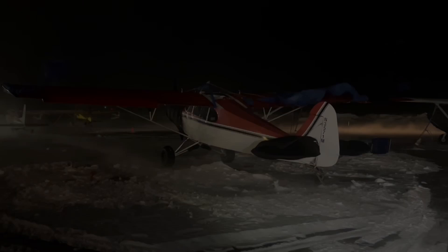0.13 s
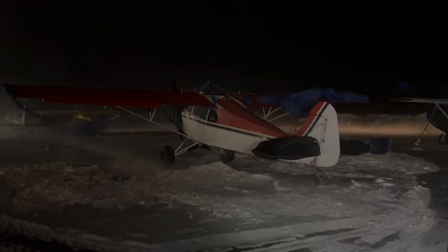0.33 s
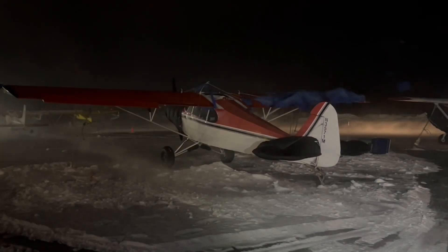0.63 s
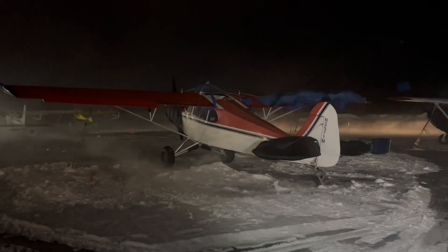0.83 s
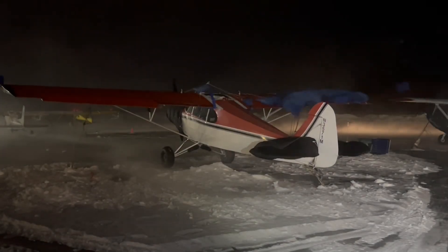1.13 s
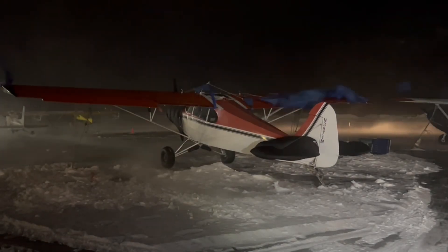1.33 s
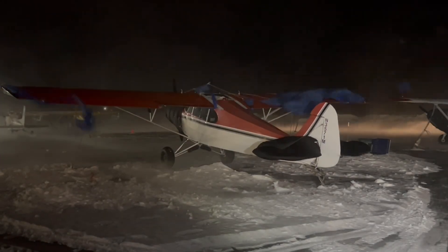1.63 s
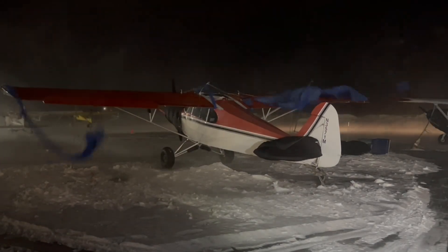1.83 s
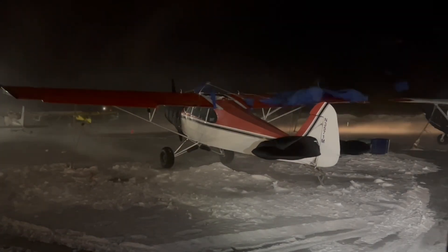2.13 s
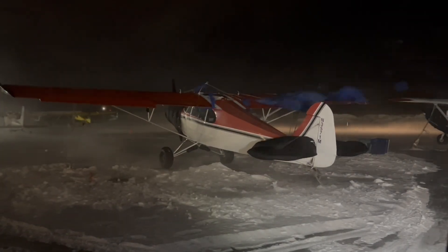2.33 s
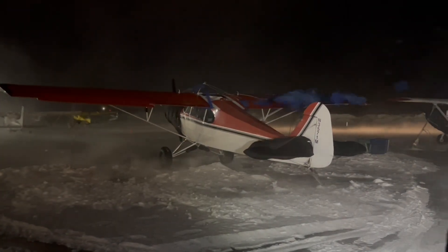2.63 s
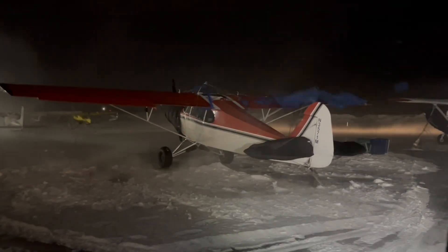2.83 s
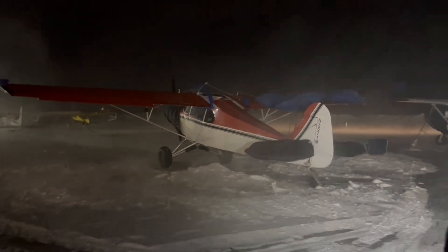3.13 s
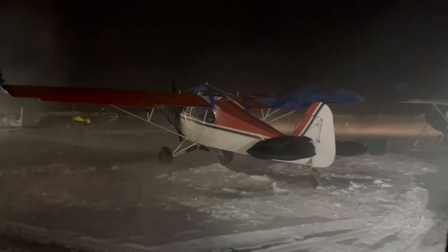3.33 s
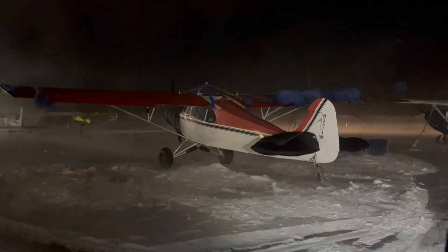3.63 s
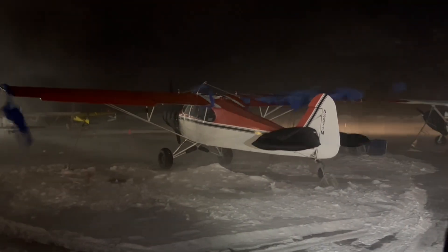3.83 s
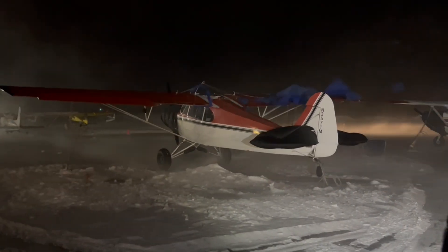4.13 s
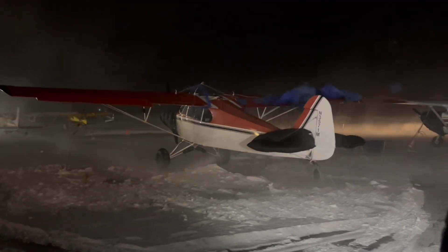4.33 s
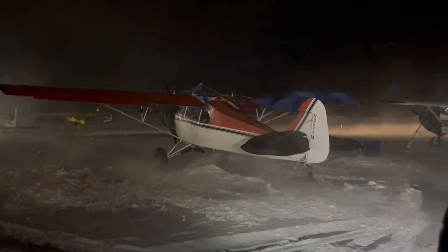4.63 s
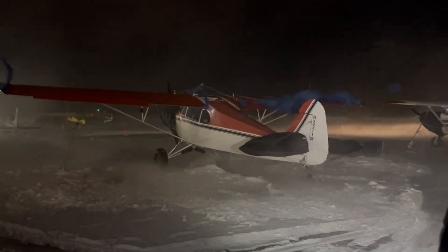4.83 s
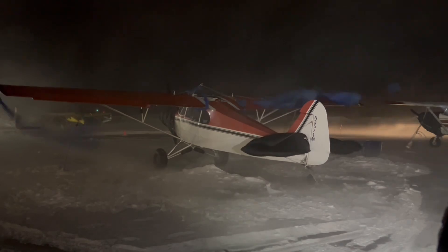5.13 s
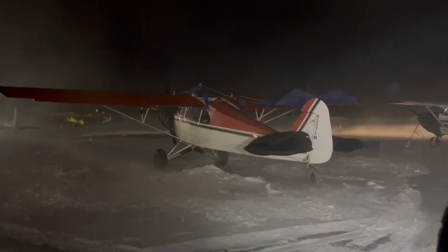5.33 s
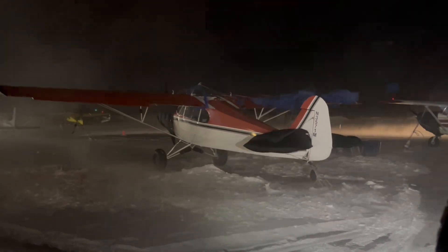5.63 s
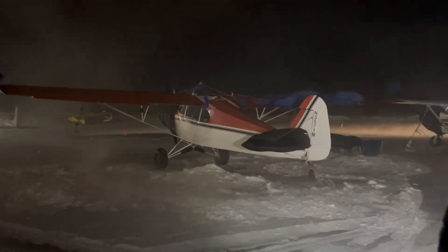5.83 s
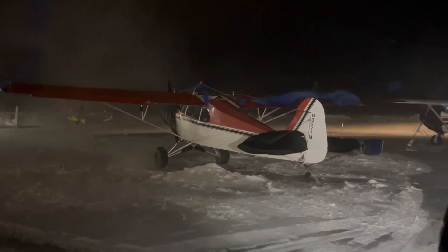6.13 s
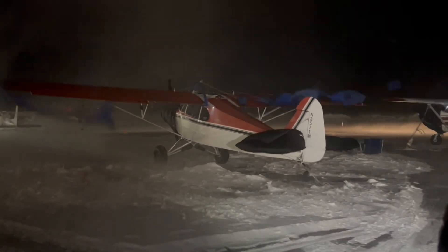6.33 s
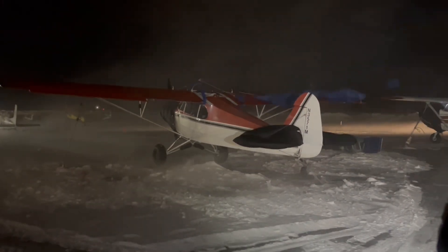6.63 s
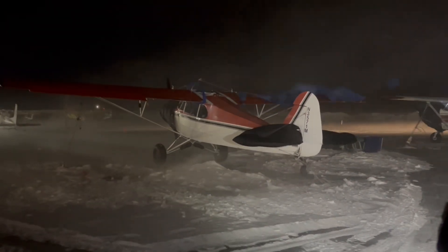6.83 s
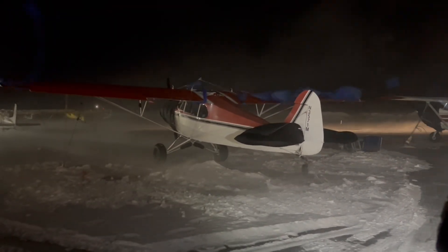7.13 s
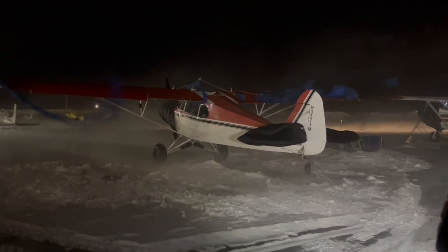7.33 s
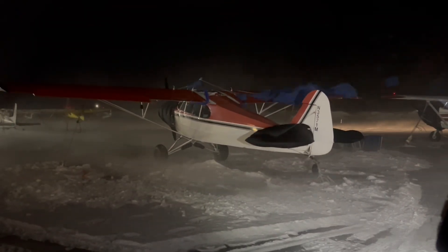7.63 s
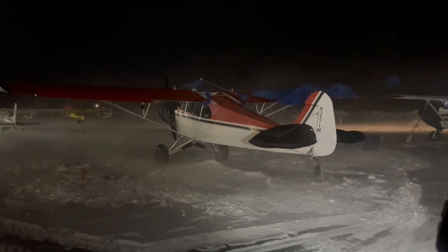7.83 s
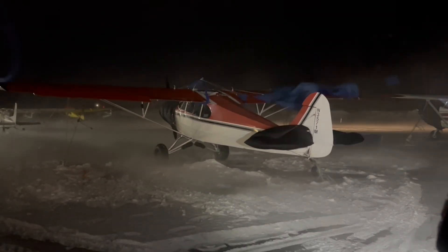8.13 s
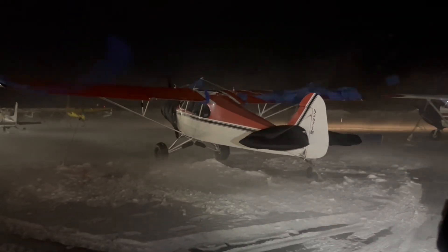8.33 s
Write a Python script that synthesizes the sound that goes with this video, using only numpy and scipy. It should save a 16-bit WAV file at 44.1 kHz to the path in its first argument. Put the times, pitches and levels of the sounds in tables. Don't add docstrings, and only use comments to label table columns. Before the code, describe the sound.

Outdoors on a snowy airfield at night, a gale fades in quickly and buffets a stereo microphone with lumpy low rumble and a duller roar. Loose covers on a parked light plane rustle faintly, puff lightly in the gusts, then from about five seconds crack, flap and slap the skin, growing denser and louder until the abrupt end.

```python
import sys
import numpy as np
from scipy import signal
from scipy.fft import rfft, irfft, next_fast_len
from scipy.io import wavfile
from scipy.ndimage import uniform_filter1d

SR = 44100
rng = np.random.default_rng(int(sys.argv[2]) if len(sys.argv) > 2 else 0)


def materialize(psi):
    bounded = np.clip(np.atleast_2d(psi).T, -1, 1)
    quanta = np.round(bounded * 32767).astype(np.int16)
    wavfile.write(sys.argv[1], SR, quanta)


def boost_factor(decibels):
    exponent = np.asarray(decibels, float) / 20
    return 10 ** exponent


N = 374409

# (time [s], rustle level [dB])
COVERS_SHAKE = [(0, -68), (.9, -75.5), (1.4, -59), (1.85, -66), (2.02, -61.5), (2.8, -63), (3.02, -69.5),
                (3.3, -52.5), (3.9, -59.5), (4.5, -58.5), (4.8, -50.5), (5.12, -60), (5.3, -47),
                (6.22, -49.5), (6.9, -41.5), (7.15, -52), (7.55, -43.5), (8.49, -40.5)]
# (frequency [Hz], level [dB per Hz])
FABRIC_SPECTRUM = [(1500, 1), (2800, 0.5), (4000, -2.5), (5500, -2.5), (6500, 0), (8000, -2.5),
                   (9700, -10.5), (11600, -3.5), (13500, -6.5), (15600, -2), (17000, -2.5)]
# (frequency [Hz], level [dB per Hz])
SKIN_SPECTRUM = [(200, -10), (500, 6.5), (1000, -4), (1500, -2), (2100, 2), (2600, -5), (3100, -18),
                 (4500, -19.5), (8000, -37), (16000, -91)]
# (frequency [Hz], phase [rad])
PORT_LEAD = [(0, 0), (400, -.4), (1200, -.65), (2100, 0), (3300, 1.1), (5200, .5), (5800, -.6), (6700, 0),
             (7500, -.3), (8600, -1.2), (10000, -3.14), (11500, -4.6), (13400, -6.28), (15700, -8.6)]


def evened(x):
    return x / np.sqrt(np.mean(x ** 2) + 1e-20)


def read_spectrum(points, hz):
    f, value = np.transpose(points)
    return np.interp(np.log(hz + 1), np.log(f + 1), value)


def control(rows, centre_db, level_db, follows):
    curve_db = np.interp(np.arange(N) / SR, *np.transpose(rows))
    return boost_factor(level_db + follows * (curve_db - centre_db))


def drift(fastest_hz, t):
    total = 0
    for f in np.geomspace(2, fastest_hz, num=30):
        total = total + np.sin(2 * np.pi * (f * t + rng.random())) / np.sqrt(f)
    return evened(total)


def turbulence(shape, size, patchy_db, flicker_db, flicker_hz):
    # (frequency [Hz], likeness [0..1])
    likeness = [(40, .999), (110, .99), (200, .95), (390, .68), (620, .85), (1000, .5), (1300, .58),
                (1600, .9), (2100, .98), (16000, .97)]
    # (frequency [Hz], level difference [dB])
    port_tilt = [(60, -0.5), (300, 3.5), (520, -1.6), (900, 6.5), (1050, 0.5), (1400, 8.5), (1750, -0.5),
                 (16000, 7.5)]
    frames = 4 * N // size + 5
    hz = np.fft.rfftfreq(size, 1 / SR)
    a, b, c, d, patches = rng.standard_normal((frames, len(hz), 5)).T
    patches = uniform_filter1d(patches, size=4, axis=0)
    patches = evened(uniform_filter1d(patches, size=8, axis=1))
    flicker = drift(flicker_hz, np.arange(frames) * size / 4 / SR)

    same = np.clip(read_spectrum(likeness, hz), 0, 1)[:, None]
    lag = np.exp(-1j * np.interp(hz, *np.transpose(PORT_LEAD)))[:, None]
    left = a + 1j * b
    right = (same * left + np.sqrt(1 - same ** 2) * (c + 1j * d)) * lag
    tilt = boost_factor(read_spectrum(port_tilt, hz) / 2)[:, None]
    level_db = read_spectrum(shape, hz)[:, None] + patchy_db * patches + flicker_db * flicker
    z = np.array([left * tilt, right / tilt]) * boost_factor(level_db)
    return evened(signal.istft(z, nperseg=size, noverlap=3 * size // 4)[1][:, :N])


def wind():
    # (time [s], buffeting level [dB])
    gale = [(0, -25), (.5, -27), (.9, -25), (1.35, -26), (1.51, -22.5), (1.66, -25), (2.8, -23),
            (3.05, -24.5), (3.33, -24.5), (4.36, -20), (4.62, -23), (5.05, -20.5), (5.71, -20), (6.04, -24),
            (6.91, -20.5), (7.21, -23.5), (7.66, -20.5), (8.49, -22)]
    # (frequency [Hz], level [dB per Hz])
    rumble_spectrum = [(15, -59), (25, -37), (32, -14), (42, 1), (62, 3), (90, -3), (150, -2), (250, -9.5),
                       (400, -22), (1500, -100)]
    # (frequency [Hz], level [dB per Hz])
    roar_spectrum = [(150, -24.5), (280, 2), (400, -3.5), (580, -1.5), (800, -12), (1100, -14), (1550, -14),
                     (1800, -18), (2600, -25), (2900, -30), (4500, -40.5), (7800, -43.5), (9500, -53),
                     (16000, -59)]
    rumble = turbulence(rumble_spectrum, size=2048, patchy_db=0.55, flicker_db=0.43, flicker_hz=13)
    roar = turbulence(roar_spectrum, size=512, patchy_db=1.44, flicker_db=-0.13, flicker_hz=28.93)
    rumble *= boost_factor(0.63) * control(gale, centre_db=0, level_db=0, follows=1)
    roar *= control(gale, centre_db=-23, level_db=-33.5, follows=0.54)
    return rumble + roar


def coloured(x, shape, extra_db=0):
    hz = np.fft.rfftfreq(x.shape[-1], 1 / SR)
    y = irfft(rfft(x) * boost_factor(read_spectrum(shape, hz) + extra_db), x.shape[-1])
    return y / np.std(y, axis=-1, keepdims=True)


def flutter():
    flutter_db, flutter_hz = -1.5, 8
    gain = boost_factor(flutter_db * drift(flutter_hz, np.arange(0, N, 32) / SR))
    return np.repeat(gain, 32)[:N]


def creases(per_s, spread_db):
    sizes = boost_factor(spread_db * np.minimum(rng.exponential(1, N), 3))
    return sizes * (rng.random(N) < per_s / SR)


def rustle():
    sizes = creases(per_s=60, spread_db=4.4)
    t = np.arange(4096) / SR
    cloth_puff = boost_factor(-60 * t / .045) * np.minimum(t / .0015, 1)
    skin_puff = boost_factor(-60 * t / 0.13) * np.minimum(t / 0.012, 1)
    cloth = evened(1.3 + signal.oaconvolve(sizes, cloth_puff)[:N])
    skin = evened(2.6 + signal.oaconvolve(sizes, skin_puff)[:N])
    cloth_noise, skin_noise = rng.standard_normal((2, N))
    bright = flutter() * cloth * coloured(cloth_noise, FABRIC_SPECTRUM)
    bright *= boost_factor(3.0) * control(COVERS_SHAKE, centre_db=0, level_db=0, follows=0.99)
    drumming = flutter() * skin * coloured(skin_noise, SKIN_SPECTRUM)
    drumming *= control(COVERS_SHAKE, centre_db=-55, level_db=-48.5, follows=0.67)
    return bright + drumming


def crackle():
    tick_t60_s = 0.0089
    decay = boost_factor(-60 * np.arange(2048) / SR / tick_t60_s)
    ticks = signal.oaconvolve(creases(per_s=58, spread_db=4), decay)[:N]
    level = control(COVERS_SHAKE, centre_db=0, level_db=-3.5, follows=0.99)
    return level * ticks * coloured(rng.standard_normal(N), FABRIC_SPECTRUM)


def folds():
    # (time [s], level [dB], t60 [s])
    puffs = [(.559, -58, .08), (0.631, -50.5, .15), (1.326, -54, 0.36), (2.166, -53, .04),
             (2.3502, -46.5, 0.14), (2.7, -50, .077), (3.1603, -46.5, 0.13), (3.2466, -40.5, 0.15),
             (3.3816, -45.5, 0.086), (3.4752, -36, 0.085), (3.5893, -48, .012), (3.6435, -51, .021),
             (3.672, -49.5, 0.18), (3.8233, -44.5, 0.14), (4.1234, -42, 0.15), (4.334, -46, 0.05),
             (4.3681, -37.5, 0.058), (4.4158, -37, 0.072), (4.5322, -46, 0.37), (4.894, -38.5, 0.19),
             (5.0328, -42.5, 0.39), (5.1308, -45.5, 0.2), (5.28, -36, .034), (5.4466, -41, .071),
             (5.6826, -42.5, 0.022), (6.6295, -53, .062), (7.1173, -39, 0.025), (7.976, -62, 0.037),
             (8.0607, -35, 0.083), (8.4104, -44, 0.032)]
    # (time [s], crack level [dB], relative slap level [dB], t60 [s])
    flaps = [(5.1918, -31.5, -0.5, 0.17), (5.3825, -34.5, 3, .045), (5.4017, -34.5, 2, 0.079),
             (5.5554, -40, 0, 0.071), (5.5755, -28, 4.5, 0.047), (5.9994, -36.5, 3, 0.14),
             (6.1643, -35.5, -7, 0.13), (6.2512, -29, 0, 0.15), (6.355, -34.5, 1, 0.22),
             (6.4282, -30, -11, .081), (6.567, -32.5, 12, 0.077), (6.732, -35, -14, 0.11),
             (6.8575, -38, 2, 0.23), (6.898, -37, 1, 0.065), (6.9776, -34.5, -2.5, 0.11),
             (7.1597, -36.5, -7, 0.06), (7.1888, -25, 10, 0.047), (7.249, -35.5, -13, 0.075),
             (7.3422, -38, -1, 0.042), (7.4362, -34, -2, 0.074), (7.4761, -31.5, 4.5, 0.061),
             (7.5546, -31, 3, .26), (7.632, -29.5, -0.5, 0.13), (7.7309, -29, -1, .09),
             (7.867, -30, 2, 0.027), (7.925, -35, -15, 0.047), (8.0071, -23, 9.5, 0.083),
             (8.14, -32.5, 0.5, 0.14), (8.2705, -41, 7, 0.25), (8.3167, -16.5, 0, 0.082)]
    # (time [s], crack level [dB], relative slap level [dB], tilt [dB per octave])
    cracks = [(5.208, -31.5, 3, 2), (5.2365, -22.5, 0, -2), (5.6696, -36, -20, 11),
              (5.7466, -34.5, -22, -1), (5.7776, -31, -16, 2), (5.7942, -18, -5, 1), (6.4154, -30, 0, 3),
              (6.4445, -23, -3, 7.5), (6.4846, -27, -8, 4.5), (6.6685, -32, -21, 5), (6.7582, -14.5, -3, 2),
              (6.7766, -22, -20, -2), (6.7833, -22, -8, 0), (6.842, -19, -4, 4), (7.3318, -33.5, 7, -15),
              (7.3837, -23, -13, 0.5), (7.498, -17, -4.5, 15), (7.527, -25.5, -16, -2),
              (7.5358, -21.5, -0.5, 21), (7.6686, -30, -17, 4), (7.7062, -23, -11.5, 0),
              (7.7137, -20.5, -20, 2.5), (7.7503, -21.5, -3, 3), (7.8247, -19, -18, 3.5),
              (7.8522, -30, -6, 0), (8.099, -29.5, -15, 0.5), (8.21, -28, -25, 7), (8.2413, -14, -22, 9),
              (8.2522, -24.5, -28, -20), (8.4333, -26, -1.5, -15)]
    # (time [s], level [dB])
    nips = [(5.3119, -39), (5.5194, -46), (5.98, -34), (6.4997, -34), (6.876, -36), (6.9542, -38),
            (7.5189, -35), (7.5982, -38), (7.6543, -31), (7.6835, -37), (7.7833, -36), (7.8337, -33),
            (7.959, -44), (8.1104, -28), (8.2907, -31), (8.4166, -44)]
    rows = []
    for s, db, slap_db, tilt_db in cracks:
        t60 = 0.0076 * boost_factor(-1.17 * (db + 20.5))
        rows.append((s, db, slap_db, tilt_db, 2.0, t60))
    for s, db, slap_db, t60 in flaps:
        rise_ms = 2.6 + 15 * t60
        rows.append((s, db, slap_db, 0, rise_ms, t60))
    for s, db, t60 in puffs:
        rows.append((s, db, -0.5, 0.9, 3.0, t60))
    for s, db in nips:
        rows.append((s, db, -26, -2, 2.0, 0.027))
    return np.array(rows)


def snaps():
    s, crack_db, slap_db, tilt_db, rise_ms, t60 = folds().T[:, :, None]
    t, hz = np.arange(8192) / SR, np.fft.rfftfreq(8192, 1 / SR)
    cloth_noise, skin_noise, ragged, uneven = rng.standard_normal((len(s), 4, 8192)).transpose(1, 0, 2)
    rise, t60 = np.clip(rise_ms - 1.4, .3, 40) / 1000, np.clip(t60, .008, .4)
    after = np.maximum(t - rise, 0)

    uneven = evened(uniform_filter1d(uneven[:, :len(hz)], size=120))
    crack_tilt_db = tilt_db * np.log2((hz + 100) / 7000)
    crack = coloured(cloth_noise, FABRIC_SPECTRUM, crack_tilt_db + uneven)
    taut = np.sqrt(1 + 0.044 / t60) * boost_factor(-60 * after / t60)
    shiver = 0.069 * boost_factor(-60 * after / 0.068)
    crack *= boost_factor(crack_db) * np.minimum(t / rise, 1) * (taut + shiver)

    ragged_db = 3.2 * evened(uniform_filter1d(ragged, size=140))
    ragged = boost_factor(ragged_db * np.minimum(t / .03, 1) ** 2)
    brief = t60 < .03
    deep_db = np.clip(2.2 * (crack_db + 20) - 20 * brief, -8, 1)
    deep_db = deep_db / (1 + (hz / 1300) ** 4)
    slap = coloured(skin_noise, SKIN_SPECTRUM, uneven[::-1] / 2 + deep_db)
    slap *= ragged * np.minimum(t / (rise + 0.00059), 1)
    slap *= boost_factor(crack_db + slap_db - 60 * after / (0.03 + 1.77 * t60))

    out = np.zeros(N + len(t))
    np.add.at(out, (s * SR).astype(int) + np.arange(len(t)), crack + slap)
    return out[:N]


def ports(x):
    size = next_fast_len(N)
    lead = np.interp(np.fft.rfftfreq(size, 1 / SR), *np.transpose(PORT_LEAD))
    turn = np.exp(.5j * lead)
    return irfft(rfft(x, size) * [turn, 1 / turn], size)[:, :N]


def scene():
    fade_start_s, fade_s = 0.038, 1.02
    fade = np.clip((np.arange(N) / SR - fade_start_s) / fade_s, 0, 1)
    covers = rustle() + crackle() + snaps()
    return fade * (wind() + ports(covers))


def thin_stereo(x):
    # (frequency [Hz], shortfall [dB])
    dropout = [(1800, 40), (2200, 19), (5000, 15), (6000, 15), (7000, 11), (9000, 4.5), (11000, 5),
               (14000, 7), (16000, 12)]
    hz, _, z = signal.stft([x[0] + x[1], x[0] - x[1]], SR, nperseg=512, noverlap=384)
    roughness = .7 * (hz > 2600)[:, None] * np.exp(2j * np.pi * rng.random(z.shape))
    z = z / 2 * (1 + roughness)

    power = uniform_filter1d(abs(z) ** 2, size=6, axis=1)
    power = abs(uniform_filter1d(power, size=12, axis=2, origin=-4))
    level_db = 10 * np.log10(power + 1e-20)
    treble_db = level_db[:, hz > 3000].mean((0, 1))
    burst_db = np.maximum(treble_db - uniform_filter1d(treble_db, size=60) - 1.5, 0)
    whim_db = 3.5 * uniform_filter1d(rng.standard_normal(z.shape), size=3, axis=1)
    short_db = level_db[::-1] - level_db + whim_db - 2.5 * burst_db
    short_db = short_db - read_spectrum(dropout, hz)[:, None]

    band = np.minimum(np.arange(len(hz)) // 4 * 4 + 2, len(hz) - 1)
    block = np.arange(z.shape[2]) // 8 * 8
    dropped = short_db[:, band][:, :, block] > 0
    z *= np.where(dropped, boost_factor(-45), 1)
    z *= np.where(hz > 15850, boost_factor(-37), 1)[:, None]
    mid, side = signal.istft(z, SR, nperseg=512, noverlap=384)[1][:, :N]
    return np.array([mid + side, mid - side])


def band_limit(x):
    return signal.sosfilt(signal.butter(12, 16810, fs=SR, output="sos"), x)


def record(dry):
    ceiling = .9
    rounded = dry / (1 + (dry / ceiling) ** 4) ** .25
    low_cut = signal.butter(4, 36, "high", fs=SR, output="sos")
    mix = signal.sosfilt(low_cut, thin_stereo(rounded))
    return band_limit(mix)


dry = scene()
out = record(dry)
materialize(out)
```